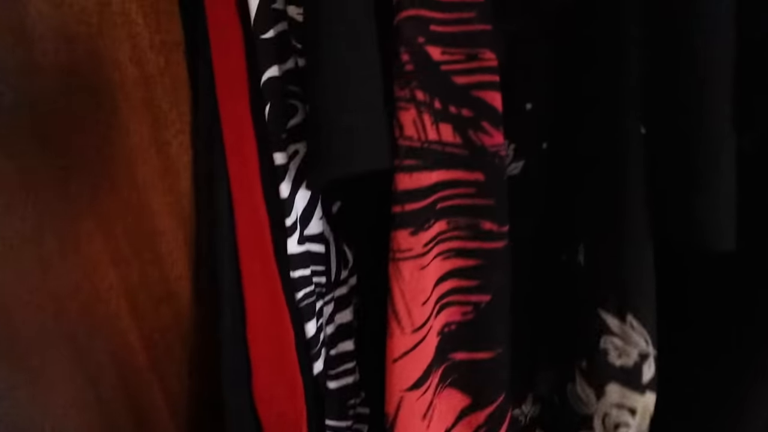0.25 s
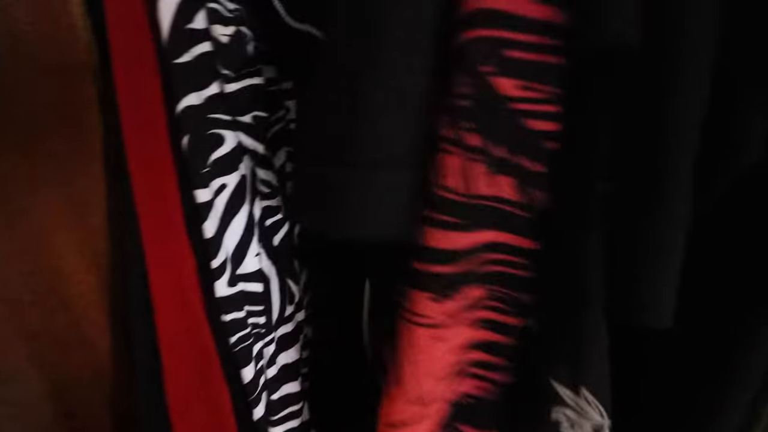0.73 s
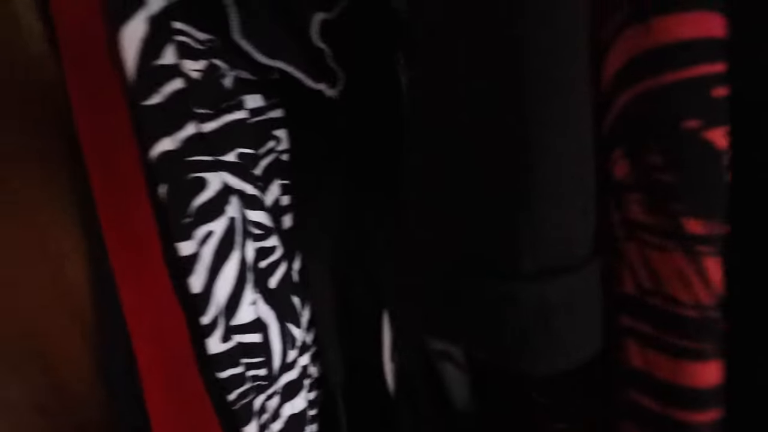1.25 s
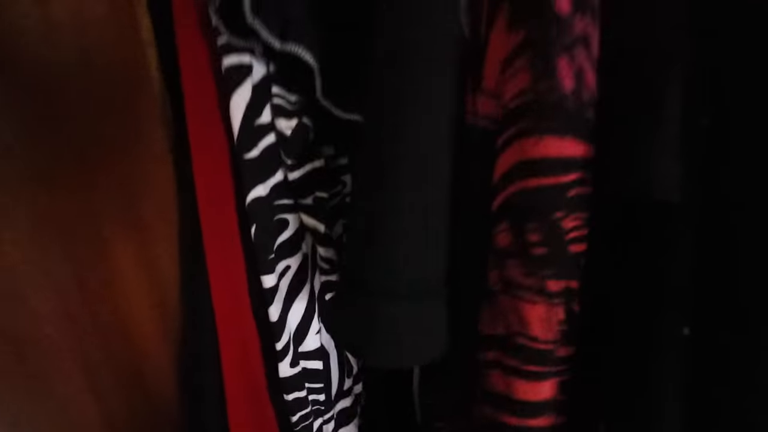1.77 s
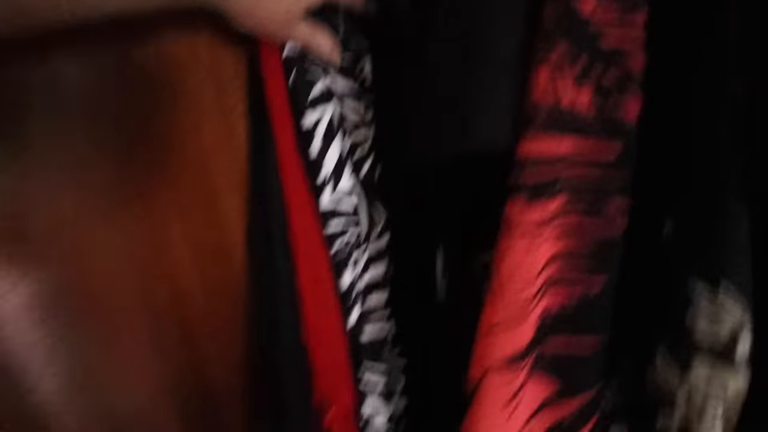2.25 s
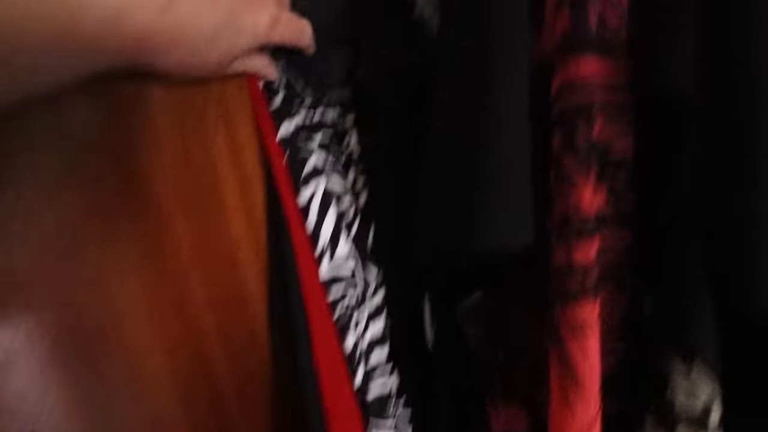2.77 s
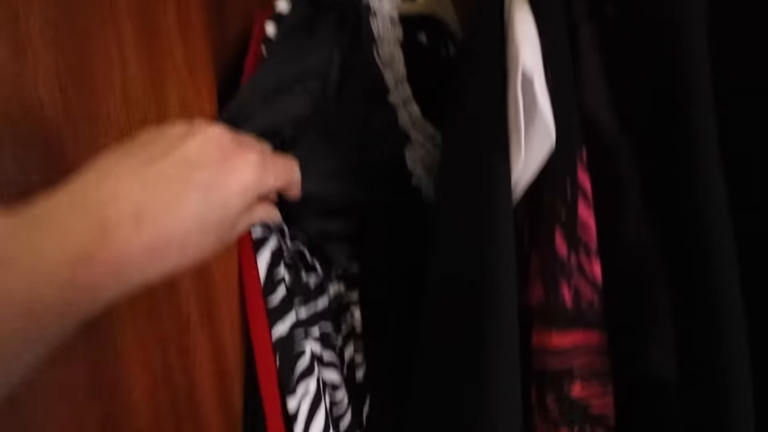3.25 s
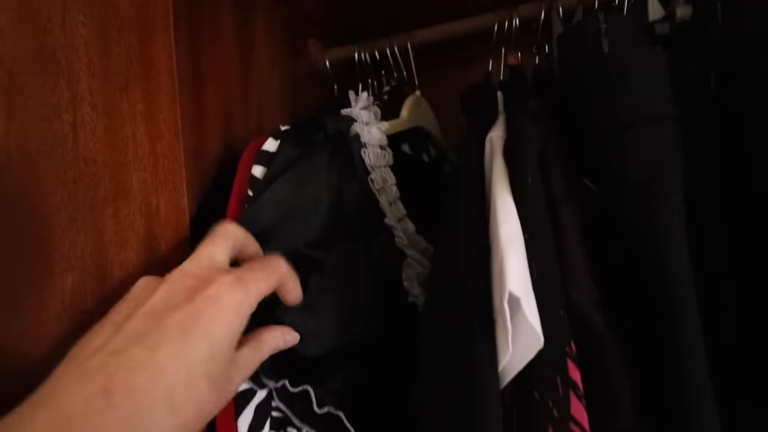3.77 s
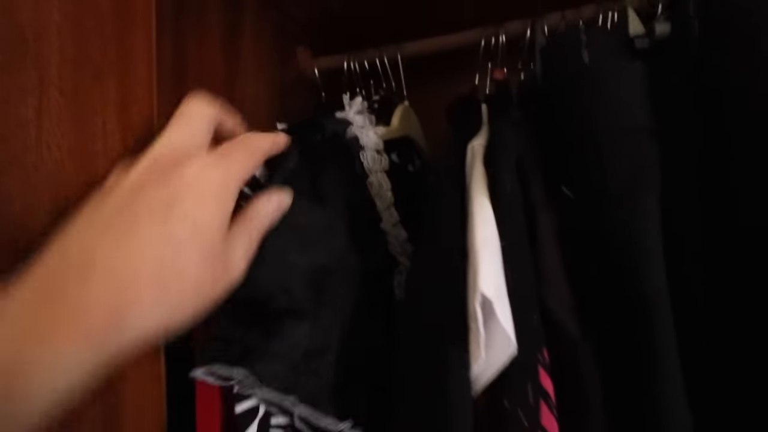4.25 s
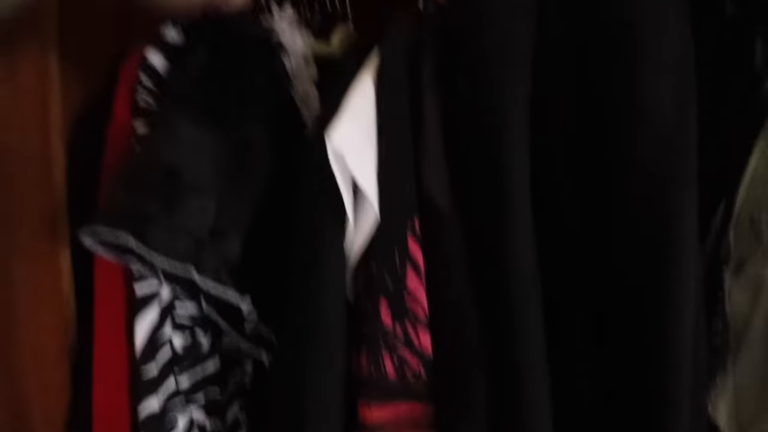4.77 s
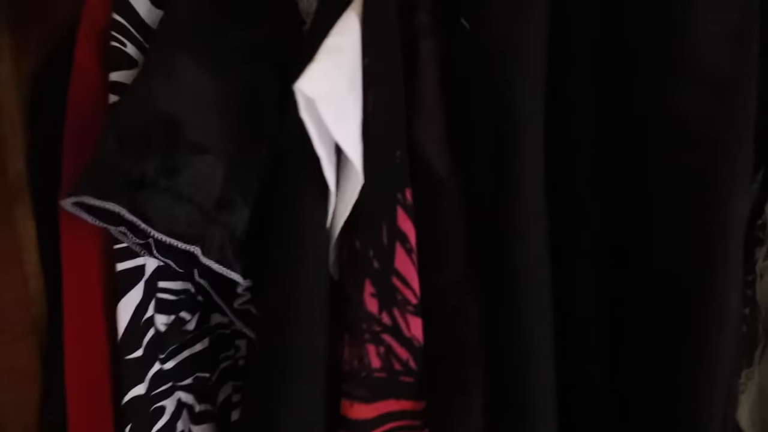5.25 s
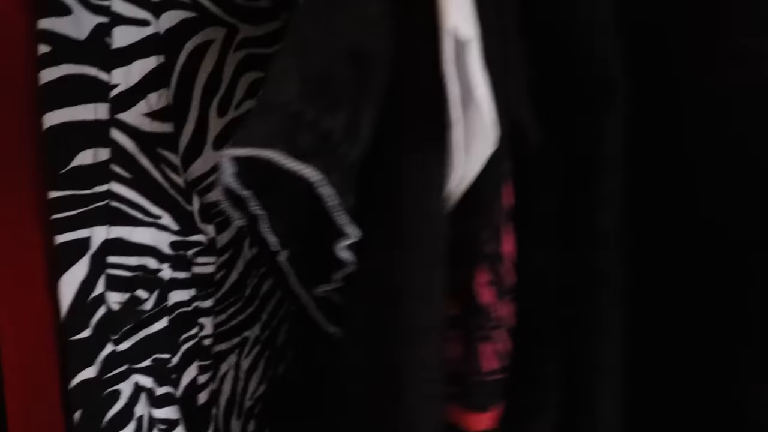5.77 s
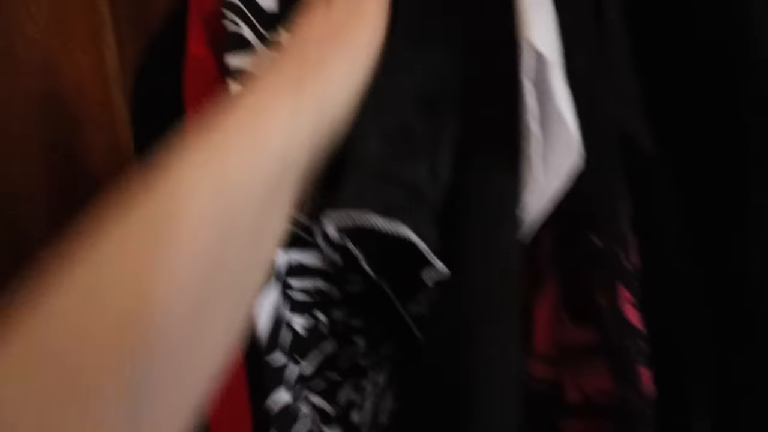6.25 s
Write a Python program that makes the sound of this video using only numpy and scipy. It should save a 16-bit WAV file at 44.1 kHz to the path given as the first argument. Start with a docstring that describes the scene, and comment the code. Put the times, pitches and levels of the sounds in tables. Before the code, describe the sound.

Hangers squeak and clatter along a wardrobe rail in two short bursts, with soft cloth rustling and low wooden knocks in a quiet small room.

```python
"""Hangers are pushed along a wardrobe rail, twice: stick-slip friction makes the hooks squeak and judder,
and impacts make the hangers clack; noise and slip pulses drive the resonances of arm, hook and rail.
Jolts shake the wooden cabinet and the clothes swing, both as low noise with set decays.
Cloth brushes and swishes in swells of coloured noise, over the steady noise hiss of a small room.
The hangers also excite a short, dull reverberant tail."""
import sys
import numpy as np
from scipy import signal
from scipy.fft import rfft, irfft
from scipy.io import wavfile
from scipy.ndimage import uniform_filter1d

SR = 44100
rng = np.random.default_rng(int(sys.argv[2]) if len(sys.argv) > 2 else 0)


def dump(signal):
    """Clip the signal to [-1, 1] and save it as 16-bit WAV at the path in sys.argv[1]."""
    limited = np.clip(np.atleast_2d(signal).T, -1, 1)
    pcm = np.round(limited * 32767).astype(np.int16)
    wavfile.write(sys.argv[1], SR, pcm)


N = 287532
TIME = np.arange(N) / SR

# left-right correlation of the hanger and cabinet sounds: (frequency [Hz], correlation [-1 to 1])
NEAR_CORRELATION = [(100, 0.98), (350, 0.95), (700, 0.69), (2400, 0.38), (4400, 0.52), (8000, 0.12),
                    (15000, .1)]
# left-right correlation of the diffuse sounds: (frequency [Hz], correlation [-1 to 1])
DIFFUSE_CORRELATION = [(50, 0.94), (130, 0.44), (350, 0.43), (700, 0.35), (1500, 0.26), (4000, 0.15),
                       (15000, 0)]


def from_db(db):
    """Level to amplitude ratio: 20 dB is a factor of ten."""
    return 10 ** (np.asarray(db) / 20)


def rms_one(x):
    """Normalise to unit mean power."""
    return x / np.sqrt(np.mean(x ** 2) + 1e-20)


def over(x, seconds):
    """Normalise stereo energy to that of unit power lasting this time."""
    energy = np.sum(x ** 2) / 2   # mean of the two channels
    return x / np.sqrt(energy / (seconds * SR) + 1e-20)


def at_hz(points, hz):
    """Interpolate a spectral curve along log frequency, as pitch is perceived."""
    table_hz, value = np.transpose(points)
    return np.interp(np.log(hz + 1e-6), np.log(table_hz), value)


def drift(rate):
    """Random modulation of unit RMS, band-limited by joining `rate` random points per second."""
    knots = rng.standard_normal(int(N / SR * rate) + 2)
    return rms_one(np.interp(TIME * rate, np.arange(len(knots)), knots))


def noise(correlation, spectrum=None, size=N):
    """Stereo noise: the balance of mid and side power sets the correlation at each frequency."""
    hz = np.fft.rfftfreq(size, 1 / SR)
    alike = np.clip(at_hz(correlation, hz), -1, 1)
    mid, side = rfft(rng.standard_normal((2, size)))
    stereo = np.sqrt(1 + alike) * mid + np.sqrt(1 - alike) * side * [[1], [-1]]
    if spectrum is not None:
        stereo = stereo * from_db(at_hz(spectrum, hz))
    return rms_one(irfft(stereo, size))


def envelope(s, rise, hold, t60):
    """Exponential decay, 60 dB per t60, after a Gaussian rise to time s and a hold."""
    attack = np.exp(-(np.minimum(TIME - s, 0) / rise) ** 2)
    return attack * from_db(-60 * np.clip((TIME - s - hold) / t60, 0, 2))


def resonate(force, modes, centre_hz, focus_db, vary_db):
    """Modal superposition: the contact point favours modes near one pitch, others fall off per octave."""
    out = 0
    for k, (hz, width, db) in enumerate(modes):
        r = np.exp(-np.pi * width / SR)   # pole radius from bandwidth
        octaves = abs(np.log2(hz / centre_hz))
        gain = from_db(db - focus_db * octaves + vary_db * rng.standard_normal())
        zeros = np.array([1, 0, -1]) * (1 - r * r) / 2
        poles = [1, -2 * r * np.cos(2 * np.pi * hz / SR), r * r]
        out = out + (-1) ** k * gain * signal.lfilter(zeros, poles, force + 1e-18)   # alternating polarity
    return out


def add(out, s, sound):
    """Superpose a sound on the mix from time s."""
    at = max(int(s * SR), 0)
    out[:, at:at + sound.shape[1]] += sound[:, :N - at]


def placed(x, share=1):
    """Interaural level difference: opposite gains left and right follow the moving hangers."""
    # path of the hangers: (time [s], left minus right level at full share [dB])
    path = [(.7, -1.5), (1.2, -4.5), (1.9, -2), (2.5, -2), (4.6, -2.5), (5.6, -3), (6.3, -3.5)]
    pan_db = share * np.interp(TIME, *np.transpose(path))
    return x * from_db([pan_db / 2, -pan_db / 2])


def room_hiss(level_db=-52.5):
    """Stationary diffuse noise: the quiet hiss of a small room."""
    # colour of the hiss: (frequency [Hz], relative spectral level [dB])
    hiss_colour = [(16, -47), (28, -5.5), (69, 1.5), (190, -4.5), (306, -3), (626, -9.5), (1250, -12),
                   (1500, -14), (3250, -16.5), (4720, -22.5), (5990, -19.5), (9660, -18), (14800, -25),
                   (16000, -33)]
    return from_db(level_db) * noise(DIFFUSE_CORRELATION, hiss_colour)


def cloth(grain_db=1.47, folds_db=1.5, rise_share=0.39):
    """Friction noise: fabric rubs in soft swells, with threads catching finely and folds in slower surges."""
    # garments brushing past: (time of peak [s], rise plus fall to 1/e of peak power [s],
    # brushing level before grain [dB], swish level before grain [dB])
    swells = [(0.156, 0.14, -52.5, -58), (0.507, 0.41, -51, -55), (1.093, 0.4, -50.5, -55.5),
              (1.41, 0.37, -55, -52.5), (1.85, 0.16, -51.5, -57.5), (2.02, 0.54, -57.5, -56.5),
              (2.454, 0.18, -48, -50), (2.63, 0.15, -54, -52), (2.844, 0.27, -51, -54.5),
              (3.48, 0.44, -62, -72), (3.594, 0.033, -56.5, -70), (3.78, 0.046, -58, -70),
              (4.11, .05, -62, -57), (4.39, 0.084, -59, -55.5), (5.048, 0.32, -56.5, -52.5),
              (5.403, 0.31, -53.5, -55.5), (5.593, .18, -40, -43), (6.012, 0.33, -51.5, -54),
              (6.175, 0.15, -67, -56)]
    # colour of the brushing: (frequency [Hz], relative spectral level [dB])
    brush_colour = [(150, -2), (300, 6.5), (600, 0), (1500, -1), (3000, -3), (4500, -10), (7000, -49)]
    # colour of the swish: (frequency [Hz], relative spectral level [dB])
    swish_colour = [(3000, -14), (5000, -5), (7000, -4), (10000, -1.5), (12000, -6.5), (16000, -14)]
    brush_power = swish_power = 0
    for s, length, brush_db, swish_db in swells:
        width = length * np.where(TIME < s, rise_share, 1 - rise_share)   # comes faster than it goes
        swell = np.exp(-((TIME - s) / width) ** 2)
        brush_power = brush_power + swell * from_db(brush_db) ** 2
        swish_power = swish_power + swell * from_db(swish_db) ** 2
    catch = from_db(grain_db * drift(400) + folds_db * drift(35))
    brush = np.sqrt(brush_power) * noise(DIFFUSE_CORRELATION, brush_colour)
    swish = np.sqrt(swish_power) * noise(DIFFUSE_CORRELATION, swish_colour)
    return catch * (brush + swish)


def cabinet_shake(rise_s=0.011):
    """Structure-borne sound: the wooden panels rumble after each jolt that the rail passes on."""
    # jolts of the rail: (time of peak [s], level [dB], decay by 60 dB [s])
    jolts = [(0.665, -36.5, 1.7), (0.82, -33.5, 0.39), (1.0, -41, 1.8), (1.08, -33.5, 0.61),
             (1.364, -42, 0.086), (1.96, -44.5, 0.16), (2.476, -45, .13), (4.104, -46, .2),
             (5.476, -39.5, 0.16), (5.545, -32, 0.87), (5.63, -32, 0.43), (5.8, -38.5, 0.2),
             (5.98, -42.5, 0.43), (6.399, -46.5, 0.32)]
    # colour of the shaken panels: (frequency [Hz], relative spectral level [dB])
    panel_colour = [(50, -20), (100, -12.5), (130, -4.5), (149, 3.5), (175, -7), (215, -1.5), (330, 1),
                    (400, -2.5), (480, -11), (900, -17), (2000, -37)]
    power = sum((from_db(db) * envelope(s, rise_s, 0, t60)) ** 2 for s, db, t60 in jolts)
    return np.sqrt(power) * noise(NEAR_CORRELATION, panel_colour)


def clothes_sway(rise_s=0.036, t60_s=1.1):
    """Damped motion: the heavy clothes swing to a stop with a soft, low thud."""
    # swings: (time of full level [s], hold [s], level [dB])
    swings = [(0.81, 0.22, -47), (2.0, .05, -60), (5.53, .06, -51)]
    # colour of the swinging clothes: (frequency [Hz], relative spectral level [dB])
    sway_colour = [(20, -20), (40, -1.5), (70, -4), (120, -6), (250, -59)]
    sway = sum(from_db(db) * envelope(s, rise_s, hold, t60_s) for s, hold, db in swings)
    return sway * noise(NEAR_CORRELATION, sway_colour)


def wardrobe(x, t60=0.18, wet_db=-13.5, gap_s=0.0059):
    """Absorption by the clothes leaves a short, dull reverberant tail, convolved with the direct sound."""
    t = TIME[:SR // 2]
    tail_colour = [(200, 17.5), (2500, -5.5), (5000, -2), (15000, -14)]   # (Hz, relative dB)
    tail = noise(DIFFUSE_CORRELATION, tail_colour, size=len(t))
    tail = tail * from_db(-60 * t / t60) * (t > gap_s)
    tail = over(tail, 1 / SR)   # unit energy
    return x + from_db(wet_db) * signal.fftconvolve(x, tail, axes=1)[:, :N]


def rail_ring(force, centre_hz):
    """Modal resonance of the rail: the low part of a hook's slide."""
    # modes of the rail: (frequency [Hz], bandwidth [Hz], relative level [dB])
    rail_modes = [(314, 49, 0.5), (421, 20, -0.5), (545.6, 30, 2), (637, 22, 2), (747, 42, 4), (828, 90, 1),
                  (973, 140, -4.5), (1308, 24, -1.5)]
    return resonate(force, rail_modes, centre_hz, focus_db=9.0, vary_db=2.0)


def arm_ring(force, centre_hz, focus_db, top_hz=4320.0):
    """Modal resonance of the hanger's arm: the woody middle of the sound."""
    # modes of the arm: (frequency [Hz], bandwidth [Hz], relative level [dB])
    arm_modes = [(1234, 114, -7.5), (1403, 43, -2), (1700, 150, -8.5), (1995, 77, -2), (2197, 115, -6),
                 (2418, 62, 0.5), (2703, 110, -4.5), (3090, 120, -3.5), (3570, 320, -8), (4320, 380, -5)]
    ring = resonate(force, arm_modes, centre_hz, focus_db, vary_db=3.5)
    return signal.sosfilt(signal.butter(4, top_hz, fs=SR, output="sos"), ring)


def hook_ring(force, centre_hz, focus_db, low_hz=6200.0):
    """Radiation efficiency: thin wire sounds only in the treble, so its modes are high-passed."""
    # modes of the wire hook: (frequency [Hz], bandwidth [Hz], relative level [dB])
    hook_modes = [(6670, 340, -4), (7240, 160, -1), (7440, 750, -5), (8240, 210, 0), (8650, 190, -2.5),
                  (9800, 590, -4.5), (10420, 140, 0.5), (11300, 570, 0), (12350, 120, -9), (12800, 500, -4),
                  (14700, 500, -12)]
    ring = resonate(force, hook_modes, centre_hz, focus_db, vary_db=3.5)
    return signal.sosfilt(signal.butter(3, low_hz, "high", fs=SR, output="sos"), ring)


def slip_pulses(slips_per_s=396.0, wander=.05, uneven_db=3.0):
    """Stick-slip oscillation: one sharp kick each time the hook lets go, at a wavering rate."""
    cycles = np.cumsum(slips_per_s * (1 + wander * drift(150))) / SR
    kicks = np.diff(np.floor(cycles), prepend=0)   # one at each whole cycle
    return rms_one(kicks * from_db(uneven_db * drift(300)))


def slides(grit_per_s=380.0, rough_db=4.5, snag_db=2.5, swell=0.55):
    """Stick-slip friction: a dragged hook squeaks regularly or grinds as grit, driving rail, arm and hook."""
    # drags along the rail: (start [s], end [s], rail level [dB], arm level [dB],
    # favoured rail frequency [Hz], favoured arm frequency [Hz], regular share of power [0-1])
    drags = [(0.356, 0.49, -78, -53, 800, 2460, 0.96), (0.499, 0.54, -50.5, -29.5, 910, 2440, 0.69),
             (0.556, 0.628, -77, -53.5, 800, 2450, 1), (0.635, 0.685, -43, -47.5, 870, 2400, 0.4),
             (0.691, 0.74, -35, -33, 830, 1800, 0.24), (0.737, 0.761, -30.5, -28, 850, 2850, 0.56),
             (0.747, 0.845, -41.5, -42, 820, 2470, 0.14), (1.02, 1.126, -45, -38.5, 1040, 1980, 0),
             (1.193, 1.417, -60, -54.5, 1010, 1790, 0), (5.006, 5.128, -81, -59, 800, 4380, .7),
             (5.443, 5.517, -68, -58, 410, 2000, 0.9), (5.508, 5.559, -35, -39.5, 736, 2210, 0.58),
             (5.535, 5.6, -30.5, -35.5, 740, 2000, 0.17), (5.608, 5.651, -24.5, -27, 610, 1980, 0.22),
             (5.78, 5.832, -54.5, -50.5, 400, 2010, .15), (5.956, 5.997, -47, -52.5, 754, 1900, 0.04),
             (6.366, 6.406, -58, -57, 620, 2120, 0.77)]
    # a regular squeak picks out fewer arm modes than grit
    grit_focus_db, squeak_focus_db = 4.5, 23.5   # dB per octave
    grit_hook_db, squeak_hook_db = -7.5, -21.5   # hook ring relative to the arm's
    out = np.zeros((2, N))
    grit = noise(NEAR_CORRELATION) * from_db(rough_db * drift(grit_per_s) + snag_db * drift(110))
    pulses = slip_pulses()
    for start, end, rail_db, arm_db, rail_hz, arm_hz, regular in drags:
        length, share = max(end - start, .01), np.clip(regular, 0, 1)
        span = slice(int(start * SR), int((start + length + .1) * SR))   # 0.1 s more to ring out
        friction = np.sqrt(1 - share) * grit[:, span] + np.sqrt(share) * pulses[span]
        progress = np.minimum(TIME[:friction.shape[1]] / length, 1)
        force = friction * np.abs(np.sin(np.pi * progress)) ** swell
        focus = grit_focus_db + share * (squeak_focus_db - grit_focus_db)
        hook_db = arm_db + grit_hook_db + share * (squeak_hook_db - grit_hook_db)
        rail = rail_ring(force, rail_hz)
        arm = arm_ring(force, arm_hz, focus, top_hz=max(3400.0, arm_hz))
        hook = hook_ring(force, 6400, focus_db=23.0, low_hz=4900.0)
        sound = from_db(rail_db) * over(rail, length) + from_db(arm_db) * over(arm, length)
        add(out, start, sound + from_db(hook_db) * over(hook, length))
    return out


def clacks(arm_db=-10.5, hook_db=-5.0, crack_db=-13.5, rise_s=0.0004, lead_s=.001, hook_focus_db=22.0):
    """Impact excitation: brief chatter rings arm and hook, with a dry crack that grows with both."""
    # hangers meeting: (time [s], relative arm level [dB], relative hook level [dB],
    # favoured arm frequency [Hz], favoured hook frequency [Hz], arm focus [dB per octave])
    meetings = [(0.6911, -5, -10, 1880, 7900, 34), (0.7046, -10.5, -14, 1470, 12100, 6),
                (0.7257, -23, -33, 3050, 7850, 17), (0.7593, -12.5, -12.5, 2100, 8850, 5),
                (0.839, -17, -14, 1290, 8450, 12), (0.8485, -35, -34, 1160, 10500, 19),
                (0.8788, -39, -38, 1200, 7700, 2), (1.013, -34, -46, 1150, 7740, 9),
                (1.0321, -26, -44, 1400, 8710, 24), (1.0442, -23.5, -18, 1430, 10300, 22),
                (1.0671, -15.5, -17.5, 3680, 8300, 20), (1.0754, -19, -20, 3080, 9200, 5),
                (1.0815, -17, -23, 1370, 10200, 9), (1.1007, -18.5, -38, 2320, 10300, 33),
                (1.1215, -20.5, -55, 1220, 9530, 23), (1.1727, -41, -62, 1870, 8560, 7),
                (1.191, -28, -67, 1220, 7700, 34), (1.228, -34, -68, 1100, 7610, 18),
                (1.2595, -34.5, -67, 1250, 8800, 22), (1.3071, -30.5, -50, 1790, 10200, 21),
                (1.404, -34, -56, 2090, 10800, 11), (1.4928, -39, -51, 2950, 9780, 28),
                (1.7945, -37.5, -64, 1240, 7160, 1), (1.8382, -37, -50, 1060, 9580, 9),
                (1.944, -14.5, -27, 2440, 6600, 9), (3.459, -44, -51, 1020, 10600, 14),
                (4.342, -44, -54, 3700, 6400, 8), (4.562, -42.5, -54, 1770, 8060, -4),
                (4.961, -41.5, -49, 2740, 11500, 9), (5.01, -36.5, -46, 4100, 10400, 9),
                (5.359, -37.5, -63, 2100, 8000, 15), (5.4385, -21.5, -39.5, 2270, 9350, 24),
                (5.459, -29, -42, 2100, 6540, 20), (5.677, -10, -23.5, 2250, 8550, 19),
                (5.9664, -34.5, -61, 1620, 8950, 16), (6, -34.5, -52, 2540, 7730, 12),
                (6.0533, -31.5, -45, 2530, 8200, -6), (6.0638, -24, -33.5, 1400, 6590, 28),
                (6.164, -43, -62, 2740, 10600, 7), (6.2773, -41.5, -52, 2140, 10400, 17),
                (6.3877, -30.5, -55, 2050, 9800, 21)]
    # colour of the dry crack: (frequency [Hz], relative spectral level [dB])
    crack_colour = [(500, -20.5), (1500, 9.5), (5000, -0.5), (10000, 4.5), (16000, -9)]
    chatter_t60_s, crack_stretch = 0.022, 1.28   # the crack fades more slowly by this factor
    out, t = np.zeros((2, N)), TIME[:SR // 5]
    attack = 1 - np.exp(-(t / rise_s) ** 2)
    fade_db = -60 * t / chatter_t60_s
    for s, arm_level, hook_level, arm_hz, hook_hz, focus in meetings:
        chatter = noise(NEAR_CORRELATION, size=len(t)) * attack * from_db(fade_db)
        arm = arm_ring(chatter, arm_hz, focus)
        hook = hook_ring(chatter, hook_hz, hook_focus_db)
        crack = noise(NEAR_CORRELATION, crack_colour, size=len(t)) * attack
        crack = crack * from_db(fade_db / crack_stretch)
        sound = from_db(arm_level + arm_db) * over(arm, 0.0079)
        sound = sound + from_db(hook_level + hook_db) * over(hook, 0.014)
        sound = sound + from_db((arm_level + hook_level) / 2 + crack_db) * over(crack, 0.019)
        add(out, s - lead_s, sound)   # the ring builds up just after first touch
    return out


def scene():
    """Linear superposition of hiss, cloth, cabinet and reverberant hangers."""
    background = room_hiss() + placed(cloth(), share=.6)
    body = cabinet_shake() + clothes_sway()
    hangers = placed(slides(), share=0.65) + placed(clacks())
    return background + body + wardrobe(hangers)


def record(dry):
    """Band limiting: peaks clip at full scale, then a steep low-pass cuts the top."""
    low_pass = signal.ellip(10, .2, 70, 16200, fs=SR, output="sos")   # ripple dB, stopband dB, cutoff Hz
    return signal.sosfilt(low_pass, np.clip(dry, -1, 1))


dry = scene()
out = record(dry)
dump(out)
```